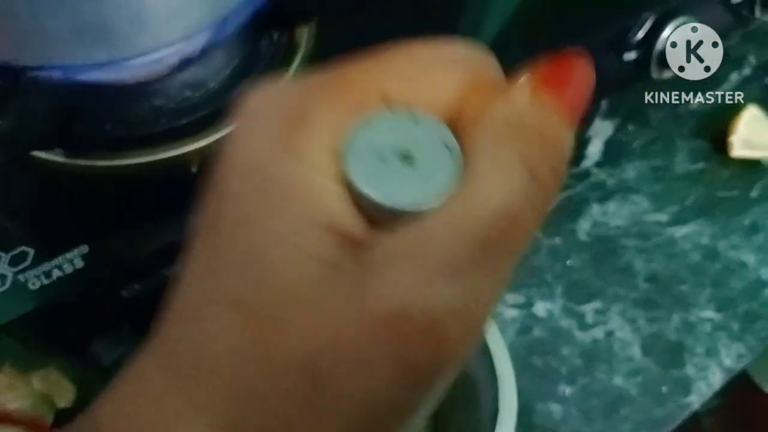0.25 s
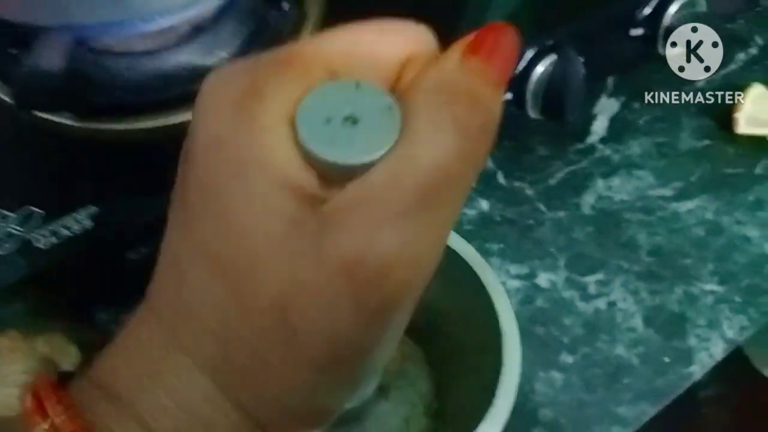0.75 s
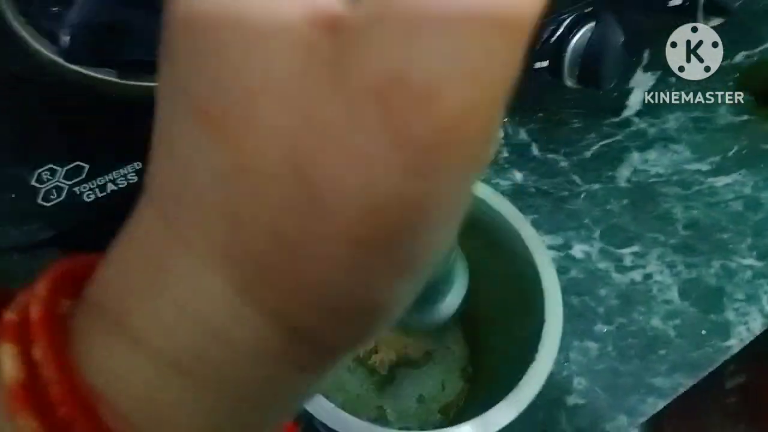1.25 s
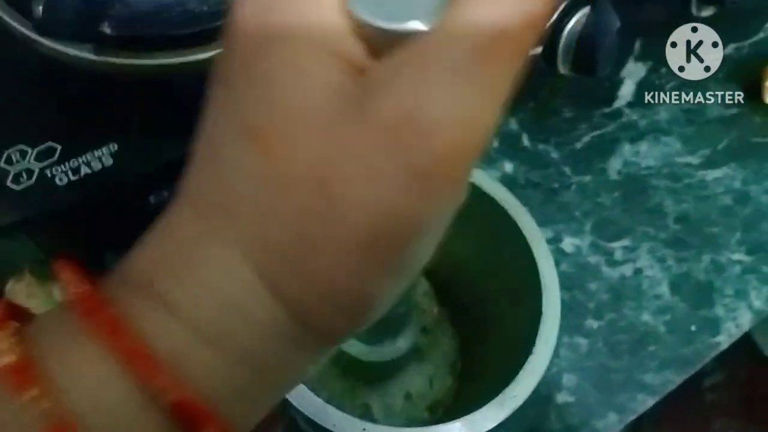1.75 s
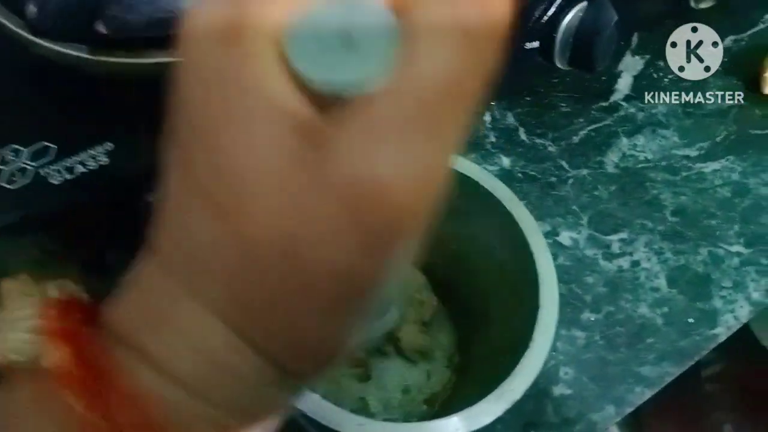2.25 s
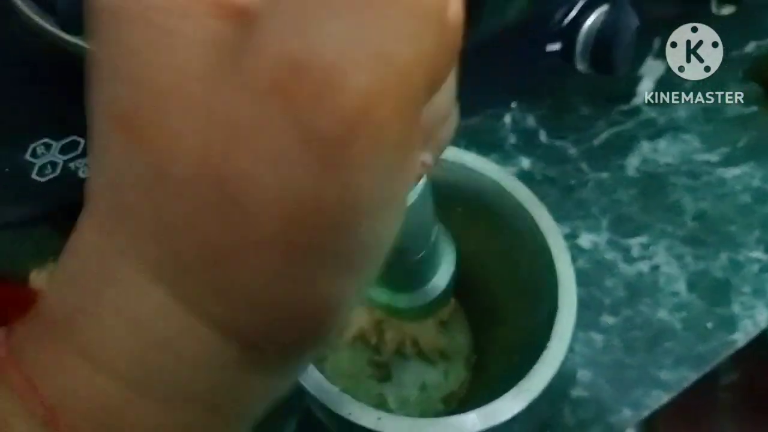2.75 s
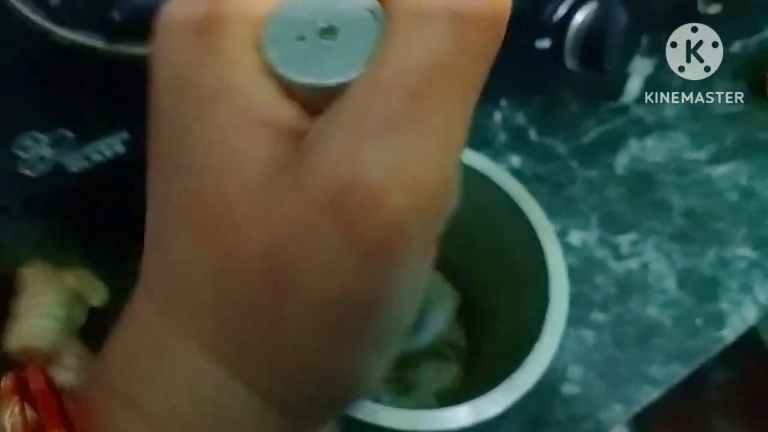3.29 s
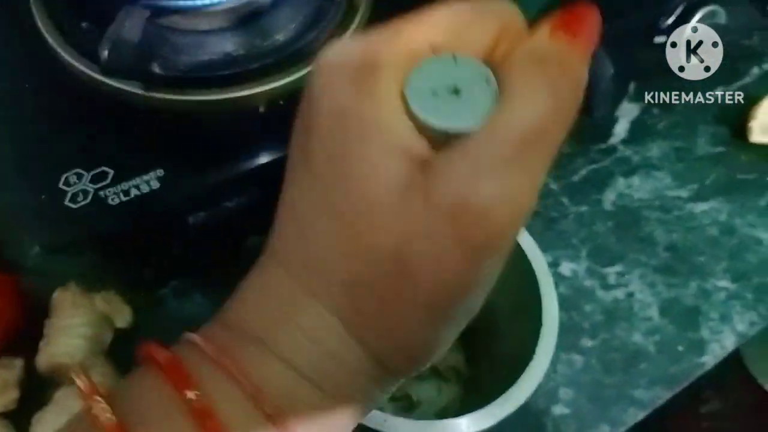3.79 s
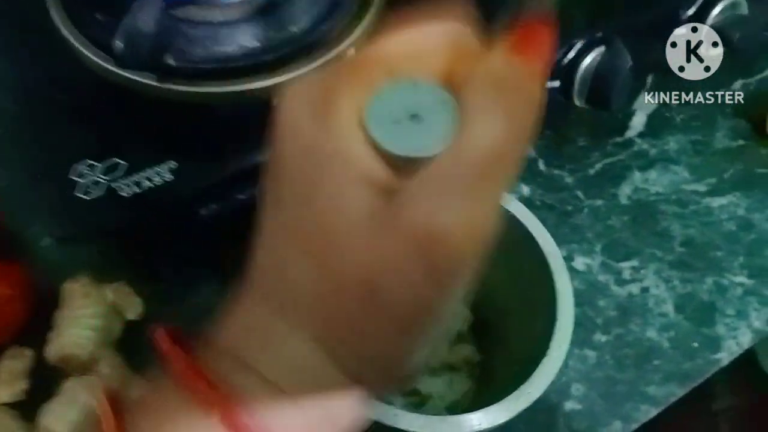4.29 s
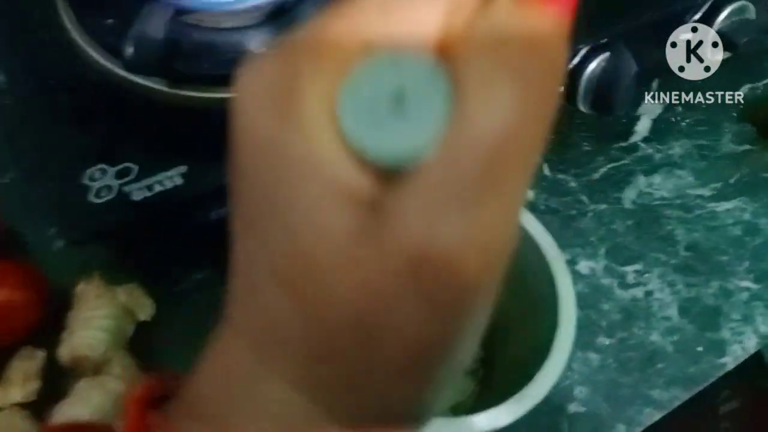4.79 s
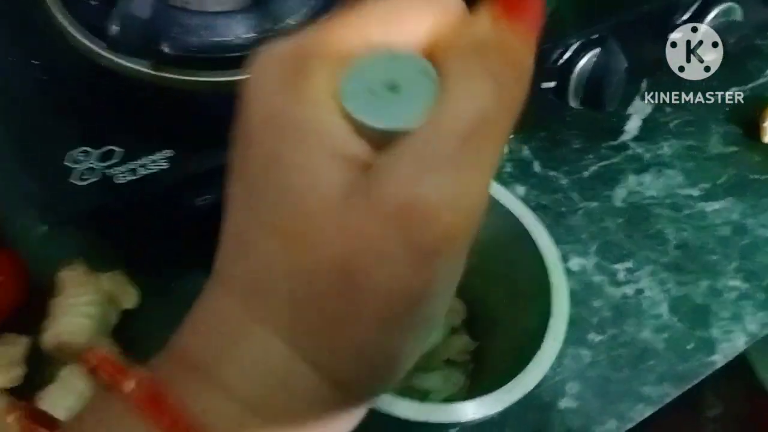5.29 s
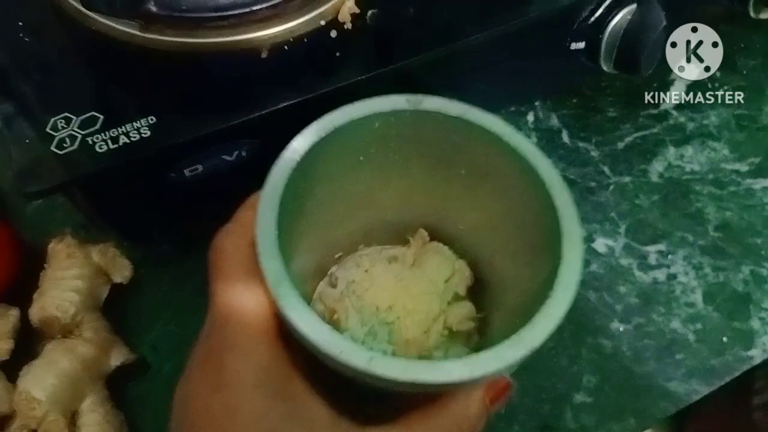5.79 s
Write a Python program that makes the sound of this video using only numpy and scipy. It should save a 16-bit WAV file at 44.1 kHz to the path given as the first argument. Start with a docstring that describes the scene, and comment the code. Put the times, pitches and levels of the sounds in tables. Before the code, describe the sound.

Steady dull metallic knocks of a pestle crushing ginger in a mortar on a resonant kitchen counter, thin bangles tinkling between the blows.

```python
"""A metal pestle pounds ginger in a metal mortar on a stone kitchen counter, about three blows a second.
Each blow is a burst of contact force: it cracks the pulp, excites the mortar's damped modes in a reverberant
kitchen and sets the counter's low modes booming. Bangles clink on the working wrist as pairs of detuned rings,
the pestle's rubbing sings faintly as narrow-band noise, and room tone lies beneath until all stops near the end."""
import sys
import numpy as np
from scipy import signal
from scipy.fft import rfft, irfft
from scipy.io import wavfile

SR = 44100
rng = np.random.default_rng(int(sys.argv[2]) if len(sys.argv) > 2 else 0)


def unload_wav(signal):
    """Save mono or channel-first audio to the path in sys.argv[1] as 16-bit WAV at rate SR, clipped to [-1, 1]."""
    wavfile.write(
        sys.argv[1],
        SR,
        np.round(np.clip(np.atleast_2d(signal).T, -1, 1) * 32767).astype(np.int16),
    )


N = 266364

# Pestle blows, the first still dying away at the start. Each row: time in seconds, contact time in seconds,
# then levels in dB, before each layer's trim, of the counter's thump, the thud of the mortar's foot,
# the knock of its bowl and the crack of the pulp.
BLOWS = [(-.125, 0.0065, -11, -17, -14.5, -36.5), (0.1805, 0.004, -10.5, -15.5, -14.5, -30.5),
         (0.5011, 0.0019, -13, -10, -11, -25), (0.8104, .004, -12.5, -11.5, -11.5, -23.5),
         (1.0884, 0.004, -27, -24.5, -20, -22), (1.3926, 0.002, -19.5, -25, -21, -22),
         (1.6944, 0.0024, -22, -27, -26, -34.5), (2.0101, 0.00071, -23, -26.5, -26, -37),
         (2.3129, 0.0018, -28, -27.5, -20, -28), (2.6149, 0.0012, -17, -32, -23.5, -24.5),
         (2.9193, 0.0023, -15, -15.5, -19.5, -22.5), (3.2123, 0.0045, -20, -17, -21.5, -27),
         (3.4757, 0.0039, -19.5, -25.5, -22, -30), (3.7449, 0.00095, -30.5, -23.5, -19, -38.5),
         (4.0473, 0.0048, -18.5, -24.5, -25.5, -24.5), (4.3567, 0.0036, -29.5, -26, -25, -21.5),
         (4.6195, 0.0032, -9.5, -21, -21, -22.5), (4.916, 0.0029, -11, -24, -25, -22.5),
         (5.211, 0.0025, -13.5, -18, -24, -19), (5.4858, 0.0008, -9.5, -17.5, -23.5, -20.5),
         (5.7498, 0.0032, -33.5, -55.5, -50, -49.5)]
# Frequency ranges of thud, knock, clang, bite and crack. Each row: low edge in Hz, high edge in Hz.
BLOW_RANGES = [(235, 520), (520, 1300), (1300, 3200), (3300, 5300), (5500, 16000)]
# Modes of the counter under the mortar, before detuning.
# Each row: frequency in Hz, relative level in dB, t60 in seconds, sign of the mode at the mortar.
COUNTER_MODES = [(81, -17, .5, -1), (109, -12, .29, -1), (124, -13, .45, -1), (139, -3.2, .24, -1),
                 (151, 0, .2, 1), (187, -7.6, .6, 1), (201, -8.7, .6, 1), (259, -24, .45, 1),
                 (316, -20, .4, 1)]
# Modes of the mortar, choked by pulp and pestle. Each row: frequency in Hz, relative level in dB, t60 in seconds.
MORTAR_MODES = [(326.3, -7, 0.04), (417.5, -9.5, 0.033), (540, -10.5, 0.03), (610, -6.5, 0.019),
                (801, -5, 0.015), (975, -9, 0.026), (1340, -7.5, 0.0026), (1518, -10, 0.013),
                (1985, 11, 0.0073), (2900, 3, 0.0037), (4000, -11.5, 0.0014), (4635, -3, 0.0019),
                (6130, -12.5, 0.0045), (8290, 14.5, 0.0023), (12140, 4.5, 0.0039), (13840, 8, 0.0049),
                (15600, 1.5, 0.005)]
# Faint longer ringing of the mortar and its stand.
# Each row: frequency in Hz, relative level in dB, t60 in seconds.
RINGING_MODES = [(316, -3, .45), (418, -3, .5), (622, -5, .45), (760, -5, .3), (932, -4, .35),
                 (1024, -5, .35), (1280, -6, .45), (1875, 0, .45), (2070, 0, .4), (2130, -4, .4)]
# Bangles touching. Each row: time in seconds, strength in dB.
CLINKS = [(0.0425, -47), (.263, -31.5), (.552, -24.5), (.703, -38), (0.8257, -35), (0.858, -43.5),
          (1.0674, -47), (1.3494, -45), (1.361, -52), (1.754, -47.5), (2.036, -42.5), (2.516, -36.5),
          (2.826, -52.5), (3.3316, -45.5), (4.093, -41.5), (4.473, -50), (4.7357, -56), (5.352, -56.5)]
# Modes of the bangles, before detuning. Each row: frequency in Hz, relative level in dB, t60 in seconds.
BANGLE_MODES = [(4460, -11, .2), (7310, 0, .15), (8515, 0, .16), (8730, -13, .17), (11750, -14, .16),
                (13660, 0, .095), (13990, -13, .12)]
# Reverberation of the kitchen. Each row: frequency in Hz, level in dB against the direct sound, t60 in seconds.
KITCHEN_DECAY = [(200, -1, 0.45), (443, 4, 0.54), (960, -3, 0.38), (1850, 5.5, 0.45), (3370, -2.5, 0.49),
                 (4800, -14, 0.38), (8400, -8, 0.36), (14000, -13.5, 0.25)]
# Spectrum of the room tone. Each row: frequency in Hz, relative density in dB per Hz.
AIR_SPECTRUM = [(24, -47), (40, -6), (407, -7.5), (637, -9.5), (686, -17.5), (778, -11.5), (1520, -23.5),
                (1860, -21.5), (2160, -22.5), (2570, -22.5), (6480, -39.5), (8110, -31), (15500, -48)]
# Faint singing between blows, as the pestle rubs along the wall.
# Each row: centre in seconds, half-width of the swell in seconds, frequency in Hz, level in dB.
RUBS = [(0.148, 0.029, 1435, -51), (2.52, 0.076, 810, -45.5), (2.547, 0.036, 1046, -49),
        (3.363, 0.065, 1864, -48)]
# Brightness of the knock, drifting as the ginger shifts under the pestle.
# Each row: time in seconds, slope in dB per octave.
BRIGHTNESS = [(.8, -3.5), (1.09, -3), (1.69, 2), (2.01, 4.5), (2.31, 0), (2.62, 0), (3.74, -3.5),
              (4.2, 0.17), (5.49, -0.7)]
# A harder touch rings brighter.
# Each row: frequency in Hz, dB at the usual strength, dB gained per dB of strength.
CLINK_COLOUR = [(4420, -2, 0.56), (7070, -4, 0.44), (8400, -.5, 1), (11750, -5.5, 1.28),
                (13970, -5.5, 1.28)]

AIR_DB = -48.5   # RMS of the room tone
STOP_S, CUTOFF_HZ = 5.768, 15650
# A soft noise swells just before each blow, stronger where the thump is weaker:
# its dB at the usual thump, dB lost per dB of extra thump.
USUAL_THUMP_DB, LEAD_NOISE_DB, LEAD_NOISE_LOSS = -14.5, -17.5, .5
USUAL_CLINK_DB = -47
# A blow that cracks through the pulp lands harder and tilts the counter's boom upward:
# usual crack in dB, dB per octave for each dB of extra crack, widest tilt in dB per octave.
USUAL_CRACK_DB, BOOM_TILT_GAIN, BOOM_TILT_LIMIT = -24.5, 0.82, 6
# Bangles swing back and touch again: usual delay in seconds, loss of strength in dB.
REBOUND_S, REBOUND_LOSS_DB = .075, 18.5
CLANG_OCTAVES, BITE_OCTAVES = 1.11, 2.65   # distance of these two ranges above the knock
# Brightness in dB per octave that leaves the force untilted, and the share of any excess that tilts it.
USUAL_BRIGHTNESS, FORCE_TILT_SHARE = -2.1, .5


def amp(db):
    """Logarithmic level: 20 dB is a factor of ten in amplitude."""
    return 10 ** (np.asarray(db) / 20)


def unit_energy(x):
    """Normalisation: the squared samples sum to one."""
    return x / np.sqrt(np.sum(x ** 2) + 1e-20)


def at_level(x, db):
    """Energy equivalence: a hit carries the energy of 10 ms of sound at that RMS level."""
    return amp(db) * np.sqrt(SR / 100) * unit_energy(x)


def at_hz(points, hz, column=1):
    """Interpolation along a logarithmic frequency axis."""
    points = np.array(points)
    return np.interp(np.log(hz), np.log(points[:, 0]), points[:, column])


def band(x, low_hz, high_hz, order=3):
    """Band-pass filtering: only the range between two edges remains."""
    sos = signal.butter(order, [low_hz, high_hz], "band", fs=SR, output="sos")
    return signal.sosfilt(sos, x + 1e-18)


def add(track, sound, s):
    """Superposition: a sound joins the track at time s, which may lie before the start."""
    start = round(s * SR)
    sound = sound[max(-start, 0):max(N - start, 0)]
    first = max(start, 0)
    track[first:first + len(sound)] += sound


def struck(modes, strengths, size=SR):
    """Modal superposition: a struck body sounds as a sum of exponentially decaying sines."""
    t = np.arange(size) / SR
    total = np.zeros(size)
    for strength, (hz, db, t60, *_) in zip(strengths, modes):
        decay = amp(db - 60 * t / t60)
        total += strength * decay * np.sin(2 * np.pi * hz * t)
    return total


def kitchen(early_db=2.5, early_s=0.0086, first_s=0.0026):
    """Reverberation: direct sound, close reflections off hob and wall, and a tail dying band by band."""
    t = np.arange(SR) / SR
    edges = np.geomspace(180, 18000, 15)   # Hz
    white = rng.standard_normal((2, SR))
    tail = np.zeros(SR)
    build_up = 1 - np.exp(-(t / first_s) ** 2)
    onset = build_up * (1 + amp(early_db) * np.exp(-t / early_s))
    for k, (low, high) in enumerate(zip(edges, edges[1:])):
        hz = np.sqrt(low * high)
        decay = amp(-60 * t / at_hz(KITCHEN_DECAY, hz, 2))
        dying = band(white[k % 2] * onset * decay, low, high, order=2)
        direct_share = np.sqrt(2 * (high - low) / SR)   # the direct sound's amplitude within this band
        tail += amp(at_hz(KITCHEN_DECAY, hz)) * direct_share * unit_energy(dying)
    return signal.unit_impulse(SR) + tail


def contact(t, contact_s, lead_noise_db, rise=0.4, fall=0.95, lead_noise_s=0.0024, solid_db=-6, evenness=0.97):
    """Contact force: after a soft noise, fibres give way in tiny snaps and the pestle bottoms out at t = 0."""
    width_s = contact_s * np.where(t < 0, rise, fall) + 1e-4
    swell = np.exp(-(t / width_s) ** 2)
    bottom = np.abs(t) == np.abs(t).min()
    snaps = unit_energy(swell * rng.standard_normal(len(t))) + amp(solid_db) * bottom
    # so many snaps share the force that no pitch stands out
    spectrum = rfft(snaps)
    snaps = irfft(spectrum / np.sqrt(np.abs(spectrum) ** 2 + evenness), len(t))
    snaps = unit_energy(snaps * np.where(t < 0, np.sqrt(swell), 1))
    lead_noise_swell = np.exp(-(t / (lead_noise_s + contact_s / 2)) ** 2) * (t < 0)
    lead_noise = lead_noise_swell * rng.standard_normal(len(t))
    return snaps + amp(lead_noise_db) * unit_energy(lead_noise)


def tilted(force, db_per_octave, low_hz=500, high_hz=5000):
    """Spectral tilt: the force leans toward bright or dull between two frequencies, level beyond them."""
    hz = np.clip(np.fft.rfftfreq(len(force), 1 / SR), low_hz, high_hz)
    return irfft(rfft(force) * amp(db_per_octave * np.log2(hz / low_hz)), len(force))


def pestle(ringing_db=-20, vary_db=2.0, thud_db=-0.17, knock_db=3.0, clang_db=4.0, bite_db=1.2, crack_db=0.5):
    """Source and filter: contact force convolved with the mortar's modes and the room; pulp sets its colour."""
    lead_s = .015   # the force begins this long before the moment of the blow
    t = np.arange(round(2 * lead_s * SR)) / SR - lead_s
    body = struck(MORTAR_MODES, (-1) ** np.arange(len(MORTAR_MODES)), size=4096)
    out = np.zeros(N)
    for s, contact_s, thump, thud, knock, crack in BLOWS:
        # the hand and the point of contact move, so reflections and ringing differ from blow to blow
        ringing_strengths = amp(vary_db * rng.standard_normal(len(RINGING_MODES)))
        ringing = unit_energy(struck(RINGING_MODES, ringing_strengths))
        bright = np.interp(s, *np.transpose(BRIGHTNESS))
        force = contact(t, contact_s, LEAD_NOISE_DB - LEAD_NOISE_LOSS * (thump - USUAL_THUMP_DB))
        force = tilted(force, FORCE_TILT_SHARE * (bright - USUAL_BRIGHTNESS))
        mortar = signal.fftconvolve(force, body)
        blow = signal.fftconvolve(mortar, kitchen() + amp(ringing_db) * ringing)
        levels = (thud + thud_db,
                  knock + knock_db,
                  knock + bright * CLANG_OCTAVES + clang_db,
                  knock + bright * BITE_OCTAVES + bite_db,
                  crack + crack_db)
        for (low, high), db in zip(BLOW_RANGES, levels):
            add(out, at_level(band(blow, low, high), db), s - lead_s)
    return out


def counter(boom_db=2.16, vary_db=1.5, detune=0.0088, lag_s=0.0023):
    """Modal excitation: each blow sets the counter booming; a harder landing favours its higher modes."""
    hz, mode_db, t60, signs = np.transpose(COUNTER_MODES)
    out = np.zeros(N)
    for s, _, thump_db, _, _, crack_db in BLOWS:
        tilt_db = np.clip(BOOM_TILT_GAIN * (crack_db - USUAL_CRACK_DB), -BOOM_TILT_LIMIT, BOOM_TILT_LIMIT)
        chance = rng.standard_normal((2, len(hz)))
        strengths = amp(tilt_db * np.log2(hz / hz[0]) + vary_db * chance[0])
        # the hand's load shifts the modes a little
        loaded = np.column_stack([hz * (1 + detune * chance[1]), mode_db, t60])
        boom = struck(loaded, signs * strengths)
        add(out, at_level(boom, thump_db + boom_db), s + lag_s)
    return out


def room_tone():
    """Stationary noise: faint steady kitchen air, white noise shaped by a fixed spectrum."""
    hz = np.maximum(np.fft.rfftfreq(N, 1 / SR), 1)
    noise = irfft(rfft(rng.standard_normal(N)) * amp(at_hz(AIR_SPECTRUM, hz)), N)
    return amp(AIR_DB) * noise / noise.std()


def touches(count=2):
    """Rebound with loss: each clink and its softer return, unevenly spaced, as (seconds, dB)."""
    found = []
    for s, db in CLINKS:
        for k in range(count):
            delay_s = k * REBOUND_S * rng.uniform(0.63, 1.3)
            found.append((s + delay_s, db - k * REBOUND_LOSS_DB))
    return found


def bangles(clink_db=8.0, vary_db=4.5, detune=0.0021, attack_s=.0005, tick_db=-17, tick_s=0.00075, wet_db=-4.0):
    """Beating of near-equal modes: two rings touch with a tick as the wrist jerks, brighter when harder."""
    out, modes = np.zeros(N), np.array(BANGLE_MODES)
    t = np.arange(SR // 2) / SR
    attack = 1 - np.exp(-t / attack_s)
    colour_db = at_hz(CLINK_COLOUR, modes[:, 0])
    growth = at_hz(CLINK_COLOUR, modes[:, 0], 2)
    for s, db in touches():
        levels = USUAL_CLINK_DB + colour_db + growth * (db - USUAL_CLINK_DB)
        tick = band(rng.standard_normal(len(t)) * np.exp(-t / tick_s), 3500, 20000)
        add(out, at_level(tick, db + tick_db), s)
        for _ in range(2):
            chance = rng.standard_normal((2, len(modes)))
            ring = np.column_stack([modes[:, 0] * (1 + detune * chance[0]), modes[:, 1:]])
            strengths = amp(levels + clink_db + vary_db * chance[1])
            add(out, attack * struck(ring, strengths / 2, size=len(t)), s)
    reflected = signal.fftconvolve(out, kitchen())[:N] - out
    return out + amp(wet_db) * reflected


def rubbing(half_width_hz=14):
    """Frictional excitation: friction feeds one narrow resonance, which swells and fades."""
    out = np.zeros(N)
    t = np.arange(SR) / SR - .5
    for s, length_s, hz, db in RUBS:
        tone = band(rng.standard_normal(SR), hz - half_width_hz, hz + half_width_hz, order=2)
        swelling = tone * np.exp(-(t / length_s) ** 2)
        add(out, amp(db) * np.sqrt(length_s * SR) * unit_energy(swelling), s - .5)
    return out


def scene():
    """Linear superposition of mortar, counter, room tone, bangles and rubbing in one channel."""
    return (pestle() + counter() + room_tone() + bangles() + rubbing())[None]


def record(dry, top=0.72, bass_hz=55):
    """Band limiting and saturation: a small microphone loses deep bass, peaks round off, the top is cut."""
    heard = signal.sosfilt(signal.butter(2, bass_hz, "high", fs=SR, output="sos"), dry)
    rounded = top * np.tanh(heard / top)
    running = np.clip((STOP_S - np.arange(N) / SR) / 0.0037, 0, 1)   # switched off over 3.7 ms
    lowpass = signal.ellip(10, .2, 80, CUTOFF_HZ, fs=SR, output="sos")
    return signal.sosfilt(lowpass, rounded * running)


dry = scene()
out = record(dry)
unload_wav(out)
```